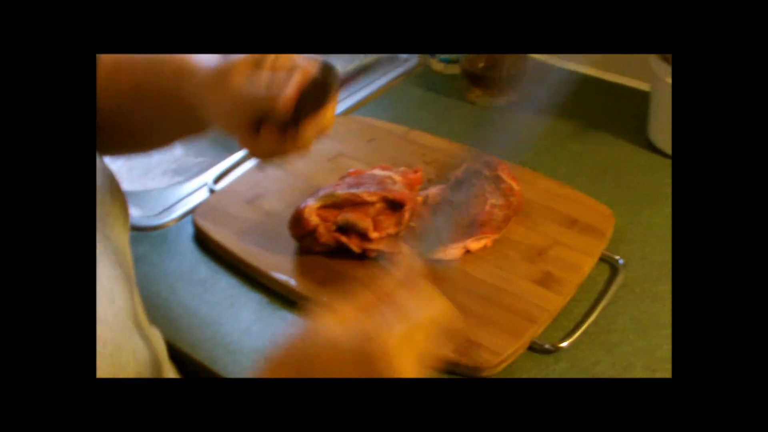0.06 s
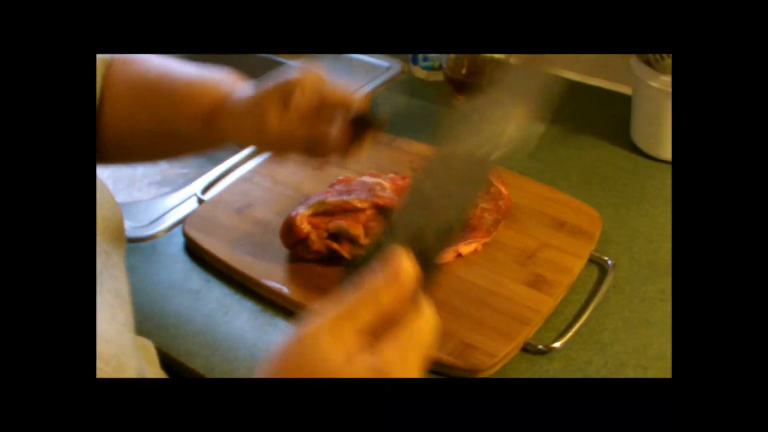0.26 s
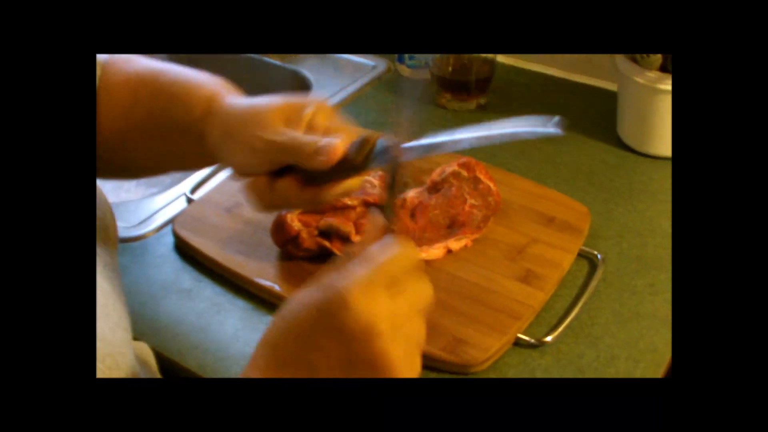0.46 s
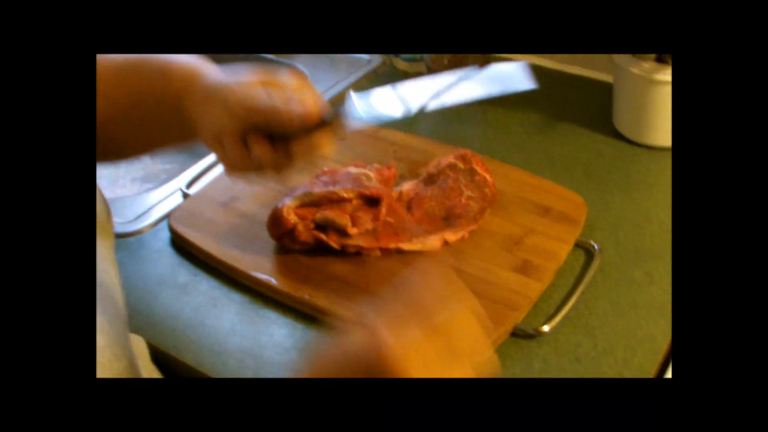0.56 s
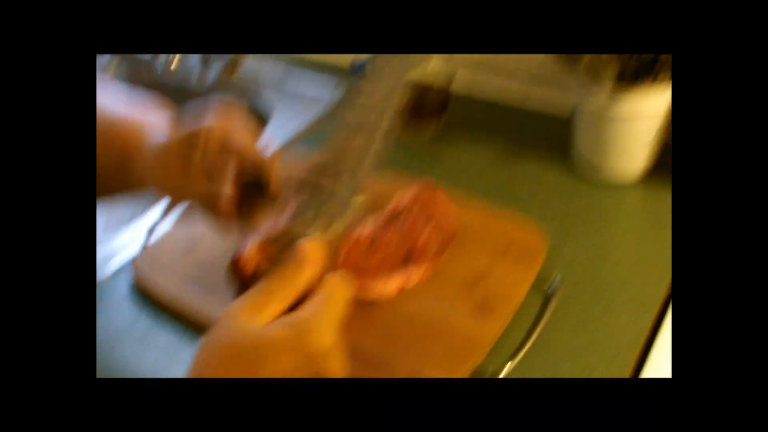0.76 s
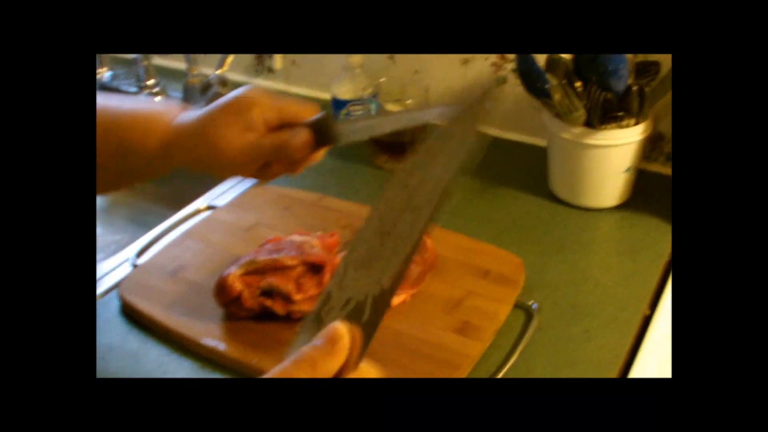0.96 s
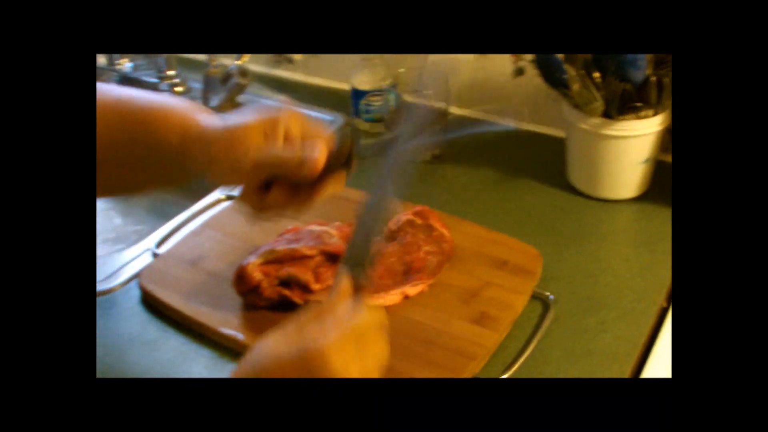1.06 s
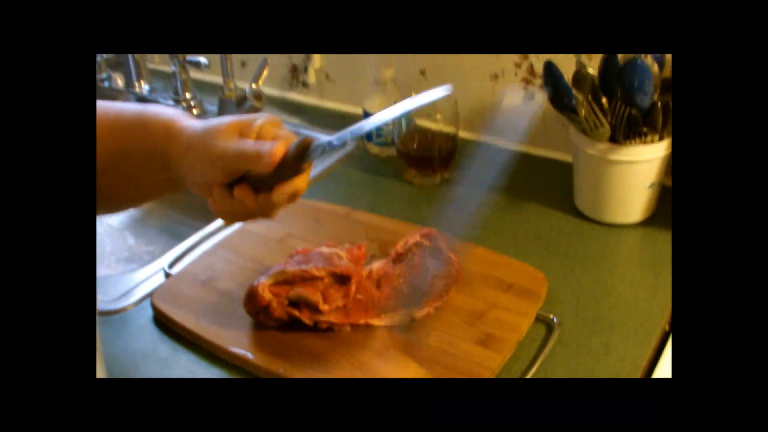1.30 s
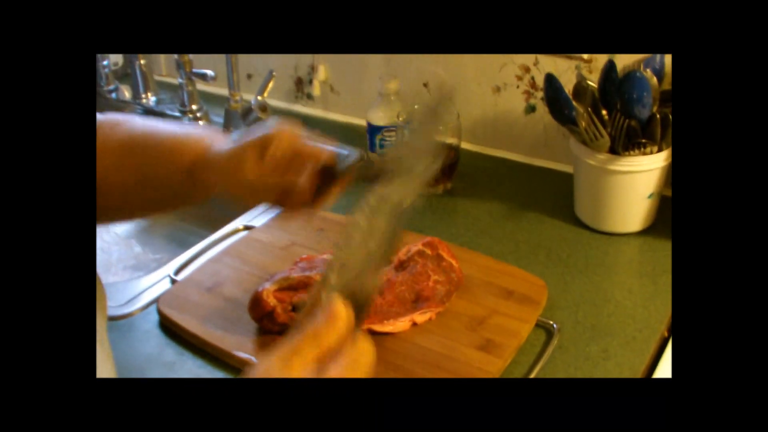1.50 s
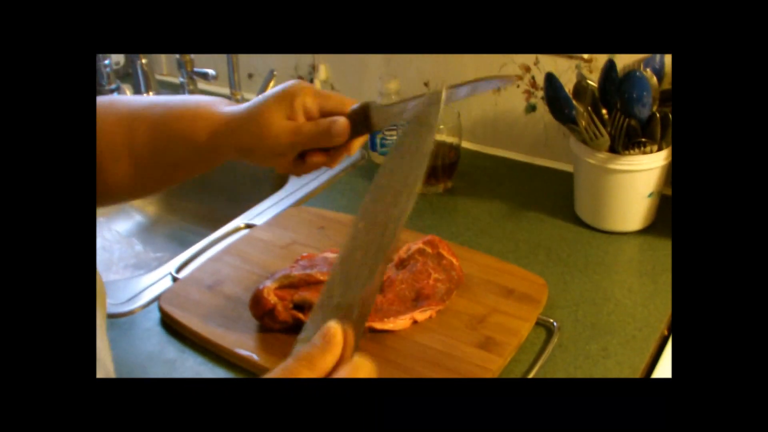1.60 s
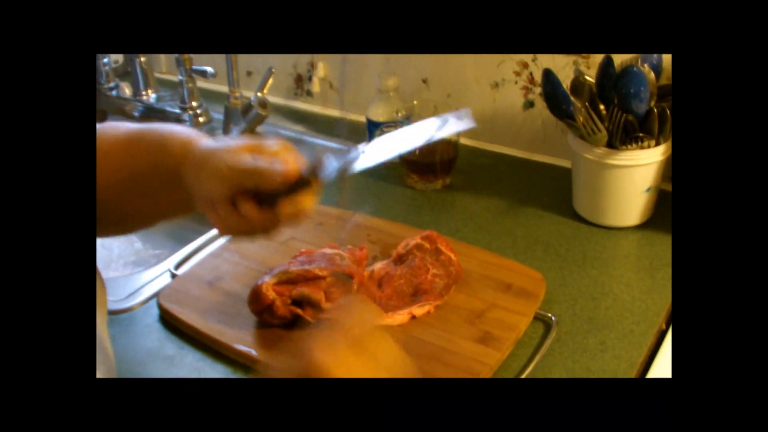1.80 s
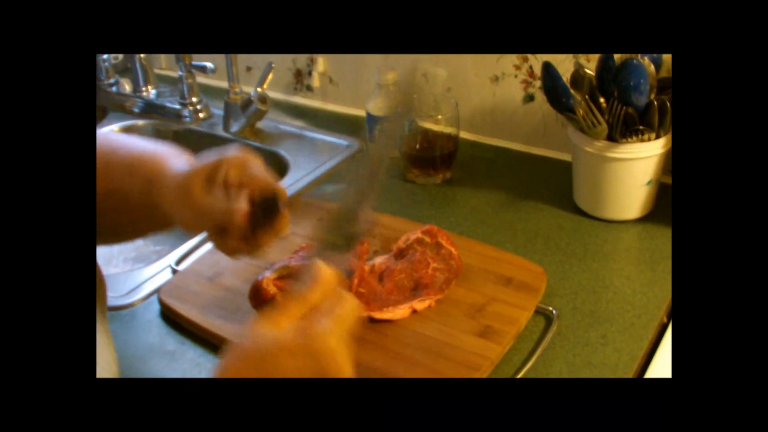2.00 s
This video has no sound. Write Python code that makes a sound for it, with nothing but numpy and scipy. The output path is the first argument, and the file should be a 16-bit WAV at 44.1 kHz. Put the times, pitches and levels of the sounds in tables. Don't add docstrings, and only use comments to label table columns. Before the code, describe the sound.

Six sharp steel-on-steel knife strokes, each a hard tick then a rising gritty scrape, close up

```python
import sys
import numpy as np
from scipy import signal
from scipy.fft import rfft, irfft, next_fast_len
from scipy.io import wavfile
from scipy.ndimage import uniform_filter1d, minimum_filter1d, map_coordinates

SR = 44100
rng = np.random.default_rng(int(sys.argv[2]) if len(sys.argv) > 2 else 0)


def bounce(signal):
    frames = np.transpose(np.atleast_2d(signal))
    limited = np.clip(frames, -1, 1)
    pcm = np.round(limited * 32767).astype(np.int16)
    wavfile.write(sys.argv[1], SR, pcm)


def attenuation_scalar(level_db):
    decades = np.asarray(level_db, float) / 20
    return 10 ** decades


N = 90272
LEAD = SR // 4
FFT_SIZE = next_fast_len(N + 2 * SR)


def unit(x):
    return x / np.sqrt(np.mean(x ** 2) + 1e-20)


def along(points, hz):
    point_hz, value = np.transpose(points)
    return np.interp(np.log(hz + 1), np.log(point_hz + 1), value)


def filtered(x, response):
    spectrum = rfft(x, FFT_SIZE) * response(np.fft.rfftfreq(FFT_SIZE, 1 / SR))
    return irfft(spectrum, FFT_SIZE)[..., :x.shape[-1]]


def causal(points):
    def response(hz):
        cepstrum = irfft(np.log(np.maximum(attenuation_scalar(along(points, hz)), 1e-6)), FFT_SIZE)
        cepstrum[1:FFT_SIZE // 2] *= 2
        cepstrum[FFT_SIZE // 2 + 1:] = 0
        return np.exp(rfft(cepstrum))
    return response


def place(track, start_s, sound):
    track[round(start_s * SR) + LEAD:][:len(sound)] += sound


# [lows below about 5 kHz drop by
STROKE_PRESSURE = [
    [(0.198, -25, -14), (0.212, -20, -4), (0.222, -16.5, -10.5), (0.233, -8.5, -8), (0.255, -15, -4),
     (0.272, -14, -2.5), (0.298, -14.5, -1.5), (0.309, -13, -2), (0.315, -26, -13)],
    [(0.49, -25, -12), (0.518, -31, -8), (0.536, -17, -6), (0.552, -11, -5.5), (0.56, -12, -3),
     (0.582, -9.5, -1.5), (0.6, -14, 1.5), (0.61, -17, 9)],
    [(0.835, -33, -22), (0.855, -27, -14), (0.861, -14.5, -5), (0.878, -10.5, -8.5), (0.896, -15, -5),
     (0.925, -12, -3), (0.945, -12.5, -4.5), (0.955, -16, -2), (0.961, -34, -2)],
    [(1.135, -35, -15.5), (1.163, -37, -16), (1.173, -20, -5.5), (1.184, -17, -3.5), (1.194, -15, -5.5),
     (1.209, -10, -4), (1.25, -12.5, -0.5), (1.259, -14.5, -6.5)],
    [(1.465, -42, -19), (1.475, -25, -9), (1.497, -17.5, -6.5), (1.503, -14, -6), (1.53, -14.5, -1.5),
     (1.555, -11.5, -1.5), (1.564, -10, 4), (1.575, -13.5, -7), (1.583, -19.5, -13.5)],
    [(1.76, -29, -14), (1.784, -36.5, -15), (1.8, -20, -6), (1.812, -14.5, -4.5), (1.828, -12.5, -2),
     (1.85, -9, -2.5), (1.864, -10, -0.5), (1.874, -20, 3)],
]


def scrape():
    n = N + LEAD
    t = (np.arange(n) - LEAD) / SR
    snags_per_s, spread_db, hiss_share, ping_share = 2600, 4, 0.7, 0.16
    snags = (rng.random(n) < snags_per_s / SR) * attenuation_scalar(spread_db * np.minimum(rng.exponential(size=n), 2.2))
    snags = snags * rng.choice([-1, 1], size=n)
    grit = np.sqrt(1 - hiss_share) * unit(snags) + np.sqrt(hiss_share) * rng.standard_normal(n)
    chatter_db, chatter_per_s = 2.2, 260
    chatter = map_coordinates(rng.standard_normal(1200), [np.arange(n) * chatter_per_s / SR])
    grit = grit * attenuation_scalar(chatter_db * chatter)
    grit = np.sqrt(1 - ping_share) * grit + np.sqrt(ping_share) * pings(n)

    earlier = unit(filtered(rng.standard_normal(n), causal(STEEL_COLOUR)))
    out = attenuation_scalar(-4.5) * ((t > -.1) & (t < -0.034)) * earlier
    for rows in STROKE_PRESSURE:
        time_s, level_db, bright_db = np.transpose(rows)
        face = unit(patchy(filtered(grit, blade()), 4))
        low = filtered(face, lambda hz: 1 / (1 + 1j * hz / 5000) ** 2)
        high = face - low
        touch = (t - time_s[0]) / 0.0019
        lift = (time_s[-1] + 0.0048 - t) / 0.0088
        contact = np.clip(np.minimum(touch, lift), 0, 1)
        tilt_db = np.interp(t, time_s, bright_db)
        coloured = attenuation_scalar(-tilt_db) * low + attenuation_scalar(tilt_db / 2) * high
        out += contact * attenuation_scalar(np.interp(t, time_s, level_db)) * coloured
    return out


# pitch_hz, level_db
STEEL_COLOUR = [(290, -108), (500, -64), (1600, -20.5), (1900, -22), (2100, -22.5), (2610, -18.5),
                (3100, -15.5), (10400, -5), (15500, -4.5)]
# pitch_hz, width_hz, level_db
BLADE_MODES = [(2120, 50, -4), (3100, 250, -0.5), (4680, 1000, -6), (5760, 400, -8), (6880, 430, -8.5),
               (8700, 1100, -11), (9380, 300, -4.5), (10350, 580, 3.5), (11630, 150, -9), (14800, 340, -12)]


def blade():
    scatter_db, shift_share = 2, .02
    scatter = rng.standard_normal((len(BLADE_MODES), 2)) * [scatter_db, shift_share]

    def response(hz):
        ring = 0
        for (pitch_hz, width_hz, level_db), (extra_db, shift) in zip(BLADE_MODES, scatter):
            center_hz = pitch_hz * (1 + shift)
            damping = 1j * hz * max(width_hz, 150)
            ring = ring + attenuation_scalar(min(level_db, 4) + extra_db) * damping / (center_hz ** 2 - hz ** 2 + damping)
        return causal(STEEL_COLOUR)(hz) * (1 + ring)
    return response


def patchy(x, depth_db):
    z = signal.stft(x, nperseg=256)[2]
    field = uniform_filter1d(rng.standard_normal(z.shape), size=3, axis=0)
    field = uniform_filter1d(field, size=3, axis=1)
    return signal.istft(z * attenuation_scalar(depth_db * unit(field)), nperseg=256)[1][:len(x)]


def pings(n):
    pings_per_s, low_hz, high_hz, t60_s, glide = 1400, 2414, 14900, .03, 4
    draw = rng.random((4000, 4))[:int(pings_per_s * n / SR)]
    start, pitch, life, level = draw[:, :1], draw[:, 1:2], draw[:, 2:3], draw[:, 3:]
    t = np.arange(700) / SR
    hz = low_hz + (high_hz - low_hz) * pitch ** 1.5
    ring_s = t60_s * (0.18 + life) * (5000 / hz) ** 0.28
    tone = np.sin(2 * np.pi * hz * t * (1 + glide * (life - .3) * t))
    wave = attenuation_scalar(-14 * level - 60 * t / ring_s) * tone * (1 - np.exp(-t / 0.00026))
    at = (start * n).astype(int) + np.arange(len(t))
    return unit(np.bincount(at.ravel(), wave.ravel())[:n])


# start_s, length_s, pitch_hz, glide_hz_per_s, level_db
SUNG_MODES = [(.213, 0.017, 1447, 6000, -31.5), (0.226, 0.057, 2090, 2202, -28),
              (0.224, 0.014, 5300, -4000, -23.5), (0.246, 0.0064, 5190, 498, -16),
              (.276, 0.015, 2240, 499, -40), (0.296, 0.02, 4650, 501, -25),
              (0.524, 0.017, 2850, 501, -30.5), (0.555, 0.015, 2074, 1004, -27.5),
              (0.582, 0.012, 4440, 9003, -22), (0.58, 0.01, 5900, 5996, -20),
              (0.599, 0.013, 6640, 505, -22), (0.848, .05, 1516, 1492, -34.5),
              (.858, .024, 3100, 2504, -30.5), (0.871, 0.021, 2114, 902, -19.5),
              (0.882, 0.013, 5620, 500, -16.5), (0.91, 0.015, 2226, 3996, -26),
              (0.911, 0.044, 3080, 500, -39), (0.937, 0.011, 2200, -6000, -53),
              (1.221, 0.015, 4750, 488, -18.5), (1.515, 0.023, 5800, 493, -24.5),
              (1.573, 0.0077, 2936, 490, -24.5), (1.817, 0.036, 3015, 5994, -29.5),
              (1.83, .03, 2190, 494, -44), (1.839, 0.029, 5440, -20000, -21),
              (1.842, 0.033, 6310, 4992, -30.5), (1.866, 0.0075, 5180, 492, -37)]


def streaks():
    out = np.zeros(N + LEAD + SR)
    for start_s, length_s, hz, glide, level_db in SUNG_MODES:
        t = np.arange(round(length_s * SR)) / SR
        drift = 0.018 * np.cumsum(rng.standard_normal(len(t)))
        swell = np.sin(np.pi * (t / length_s) ** 0.88)
        tone = np.sin(2 * np.pi * (hz + glide * t / 2) * t + drift)
        place(out, start_s, attenuation_scalar(level_db) * swell * tone)
    return out[:N + LEAD]


def crack(shape):
    click = np.zeros(SR // 4)
    click[0] = 1
    steel = filtered(click, causal([(hz, 0.66 * db) for hz, db in STEEL_COLOUR]))[:1024]
    burst = shape * np.append(2, rng.standard_normal(len(shape) - 1))
    wave = signal.fftconvolve(burst, steel)[:len(shape)]
    return wave / np.abs(wave).max()


# start_s, peak_db, shiver_db [relative to crack], shiver_t60_s
BLADE_LANDINGS = [
    (0.1863, 1, -10, 0.11),
    (.472, -3, 18.5, 0.075),
    (.815, -19, 8, 0.13),
    (0.8245, 0, -7.5, 0.091),
    (1.1195, -1.5, 6, 0.06),
    (1.4529, 2, -12, 0.061),
    (1.74, -4, 12, 0.1),
]


def landings():
    out, t = np.zeros(N + LEAD + SR), np.arange(SR // 4) / SR
    crack_t60_s, thud_db, thud_s = 0.0063, -33.5, 0.0016
    for start_s, peak_db, shiver_db, shiver_t60_s in BLADE_LANDINGS:
        shape = attenuation_scalar(-60 * t / crack_t60_s) + attenuation_scalar(shiver_db - 60 * t / shiver_t60_s)
        thud = attenuation_scalar(thud_db) * (1 - t / thud_s) * np.exp(-t / thud_s)
        place(out, start_s, attenuation_scalar(peak_db) * (crack(shape) + thud))
    return out[:N + LEAD]


# start_s, pitch_hz, level_db, t60_s
BENDING_MODES = [(.187, 1340, -33, 0.12), (.187, 501, -38, 0.083), (.187, 2880, -30, 0.053),
                 (.472, 763, -43, 0.09), (.472, 1853, -40, 0.11), (.476, 3730, -29, 0.058),
                 (.816, 513, -41, 0.057), (.825, 1336, -29, 0.044), (.825, 566, -40, 0.064),
                 (.825, 2830, -33, 0.08), (1.12, 758, -40, 0.07), (1.12, 1686, -41, 0.22),
                 (1.12, 3470, -32.5, 0.075), (1.452, 684, -37.5, 0.27), (1.452, 1503, -35.5, 0.25),
                 (1.452, 2995, -34, 0.1), (1.74, 1484, -40.5, 0.23), (1.74, 2170, -46, 0.14),
                 (1.74, 3100, -31.5, 0.082), (1.74, 3500, -32, 0.046), (1.74, 785, -45.5, .07)]


def bends():
    out, t = np.zeros(N + LEAD + SR), np.arange(SR // 4) / SR
    for start_s, hz, level_db, t60_s in BENDING_MODES:
        drift = .07 * np.cumsum(rng.standard_normal(len(t)))
        decay = attenuation_scalar(level_db + 7.5 - 60 * t / min(t60_s, .13))
        place(out, start_s, decay * np.sin(2 * np.pi * hz * t + drift) * (1 - np.exp(-t / 0.001)))
    return out[:N + LEAD]


# start_s, peak_db
LARGE_SNAGS = [(.188, -5), (.2225, -13), (.2312, -7), (.2411, -4), (.2525, -9), (.2785, -8), (.3062, -3),
               (.536, -15), (.5555, -8), (.5728, -6), (.594, -7), (.6005, -6), (.859, -11), (.8732, -3),
               (.8801, -1), (.9512, -2), (.9533, -1), (1.173, -16), (1.1816, -14), (1.204, -8),
               (1.2126, -8), (1.23, -6), (1.247, -7), (1.5012, -10), (1.524, -10), (1.5632, -4),
               (1.798, -16), (1.8085, -12), (1.8277, -7), (1.8418, -6), (1.855, -5)]


def large_snags():
    out, t = np.zeros(N + LEAD + SR), np.arange(SR // 4) / SR
    t60_s, low_cut_hz, boost_db = .008, 2200, 2
    for start_s, peak_db in LARGE_SNAGS:
        place(out, start_s, attenuation_scalar(peak_db + boost_db) * crack(attenuation_scalar(-60 * t / t60_s)))
    return filtered(out, lambda hz: (1j * hz / (low_cut_hz + 1j * hz)) ** 3)[:N + LEAD]


# pitch_hz, t60_s
KITCHEN_DECAY = [(500, 0.24), (2000, 0.35), (6000, 0.29), (14000, 0.21)]


def kitchen(x):
    out = np.zeros(len(x))
    wall_s = 0.00071
    starts = [round(rows[0][0] * SR) + LEAD - 1500 for rows in STROKE_PRESSURE]
    cuts = [0] + starts + [len(x)]
    for a, b in zip(cuts, cuts[1:]):
        hz, t, z = signal.stft(rng.standard_normal(SR // 2), SR, nperseg=256)
        decay = attenuation_scalar(-60 * t / along(KITCHEN_DECAY, hz)[:, None])
        tail = signal.istft(z * decay, SR, nperseg=256)[1]
        tail = tail * (1 - np.exp(-np.arange(len(tail)) / SR / wall_s))
        wet = signal.fftconvolve(x[a:b], tail / np.linalg.norm(tail))[:len(x) - a]
        out[a:a + len(wet)] += wet
    return out


# pitch_hz, level_db
AIR_COLOUR = [(15, -44), (25, -37.5), (124, -4.5), (429, 3.5), (936, -1.5), (1180, -8.5), (2090, -17),
              (2240, -22), (6000, -19.5), (7800, -55), (13200, -120)]
# pitch_hz, level_db
HUM_LINES = [(118.4, -81.5), (231.5, -62), (409.1, -59.5), (511.4, -65.5), (699.8, -74.5)]


def background():
    t = np.arange(N + LEAD) / SR
    air = unit(filtered(rng.standard_normal(len(t)), lambda hz: attenuation_scalar(along(AIR_COLOUR, hz))))
    out = attenuation_scalar(-52) * air
    for hz, level_db in HUM_LINES:
        drift = np.cumsum(rng.standard_normal(len(t))) * 0.021
        out += attenuation_scalar(level_db + 5) * np.sin(2 * np.pi * hz * t + drift)
    return out


# pitch_hz, likeness [0 to 1]
PORT_LIKENESS = [(30, .7), (150, .96), (1000, .985), (2800, .96), (8300, .98), (9400, .77), (11000, .74),
                 (11700, .94), (12800, .33), (15000, .2)]


def pair(x):
    z = signal.stft(x, nperseg=128)[2]
    scrambled = z * np.exp(2j * np.pi * rng.random(z.shape))
    other = signal.istft(scrambled, nperseg=128)[1][:len(x)] * np.sqrt(2)

    def spread(hz):
        angle = np.arccos(np.clip(along(PORT_LIKENESS, hz), -1, 1)) / 2
        return np.array([np.cos(angle), np.sin(angle)])
    mid, side = filtered(np.array([x, other]), spread)
    return np.array([mid + side, mid - side])


def scene():
    knives = scrape() + landings() + bends() + large_snags() + streaks()
    room = attenuation_scalar(-10) * kitchen(knives) + background()
    return (pair(knives) + pair(room))[:, LEAD:]


def top_cut(x):
    return signal.sosfilt(signal.butter(12, 16650, fs=SR, output="sos"), x)


# pitch_hz, difference_db
PORT_DIFFERENCE = [(8200, 0), (9800, 3), (11200, 1.5), (12400, -3), (13100, -8), (13900, -12.5),
                   (16000, -13)]
# pitch_hz, level_db
CAPSULE_COLOUR = [(40, -24), (150, -16.5), (11500, 0.5), (13000, 1), (14500, -5.5), (15300, -9)]


def record(dry):
    def ports(hz):
        top_hz = 15420
        band_db = -30 * np.clip((hz - top_hz + 150) / 300, 0, 1) - 40 * np.clip((hz - 16100) / 700, 0, 1)
        balance_db = along(PORT_DIFFERENCE, hz) * np.array([[.5], [-.5]])
        return attenuation_scalar(balance_db + along(CAPSULE_COLOUR, hz) + band_db)
    x = filtered(dry, ports)
    gain = minimum_filter1d(np.minimum(1, .97 / (np.abs(x) + 1e-9)), size=129, axis=1)
    gain = uniform_filter1d(uniform_filter1d(gain, size=33, axis=1), size=33, axis=1)
    x = x * gain
    x[1, round(.9537 * SR) + np.array([0, 1, 15])] -= attenuation_scalar(-24)
    return top_cut(x)


dry = scene()
out = record(dry)
bounce(out)
```